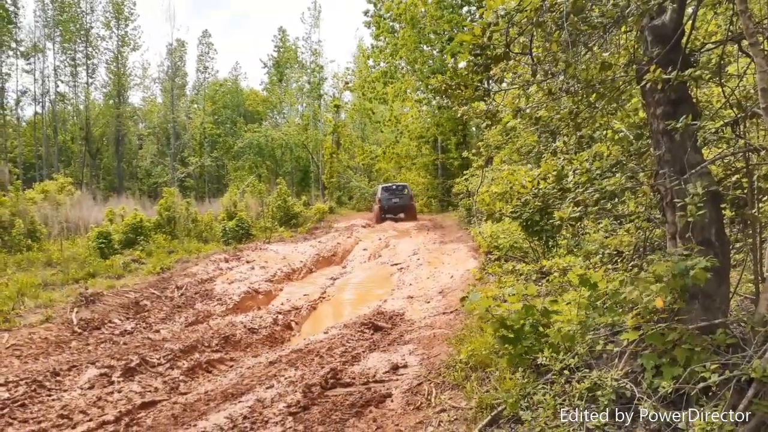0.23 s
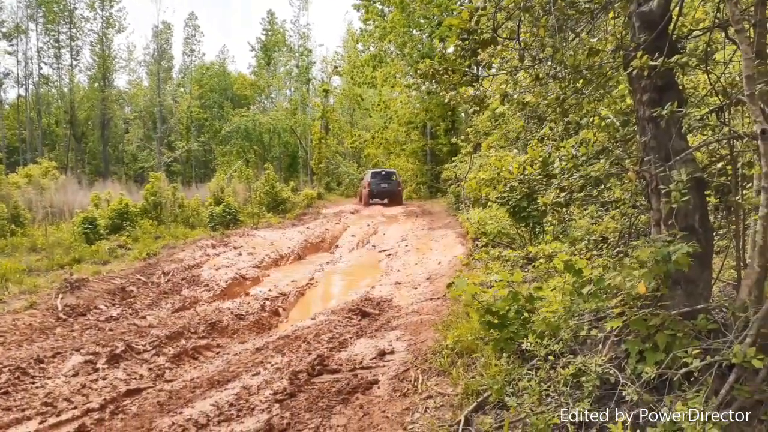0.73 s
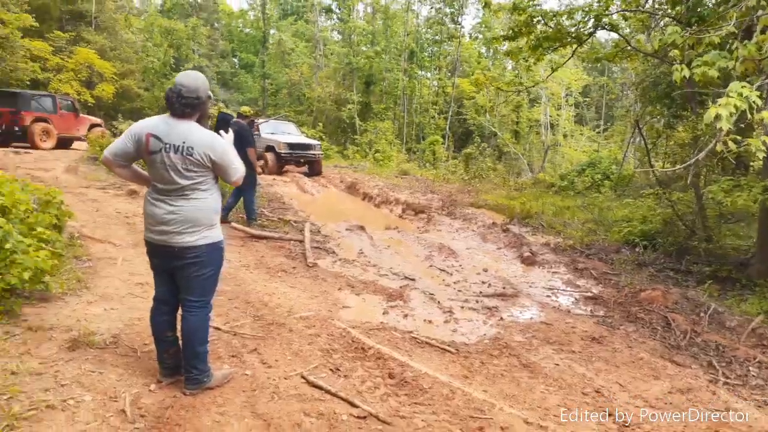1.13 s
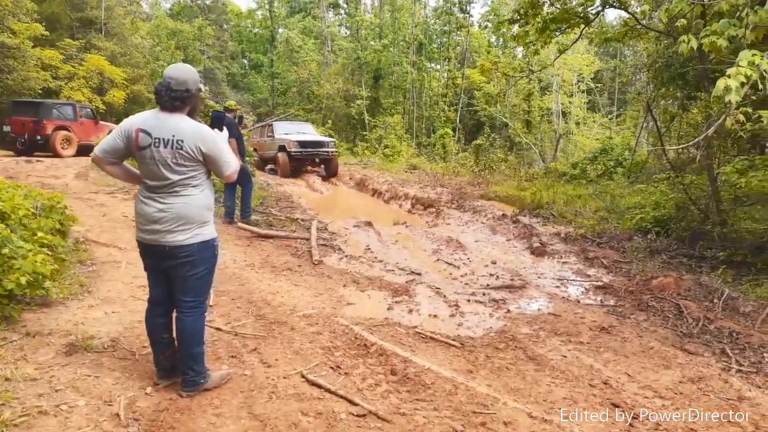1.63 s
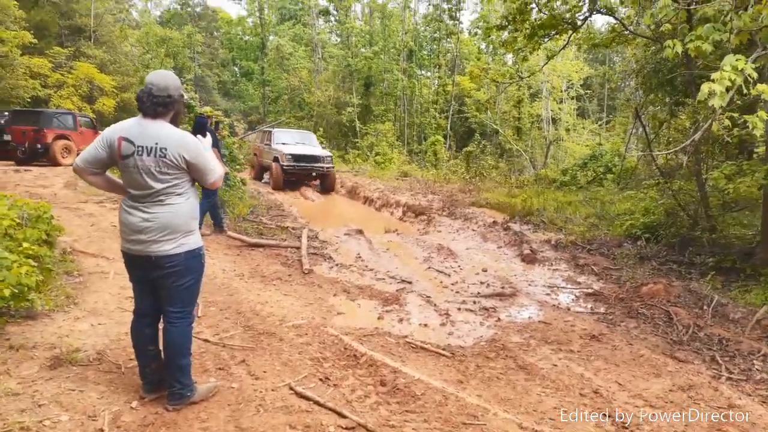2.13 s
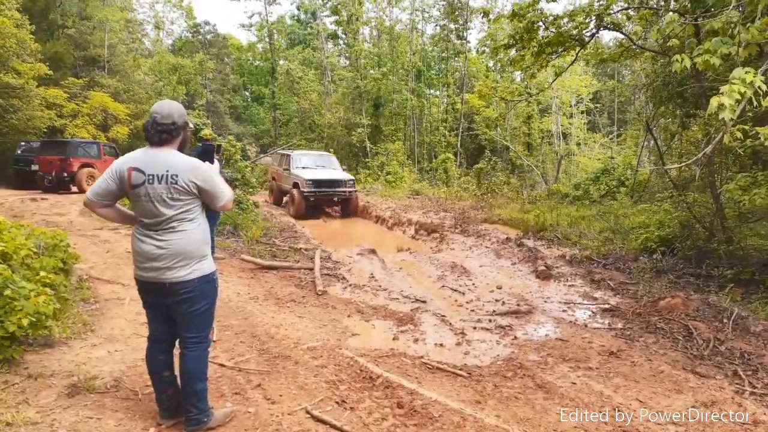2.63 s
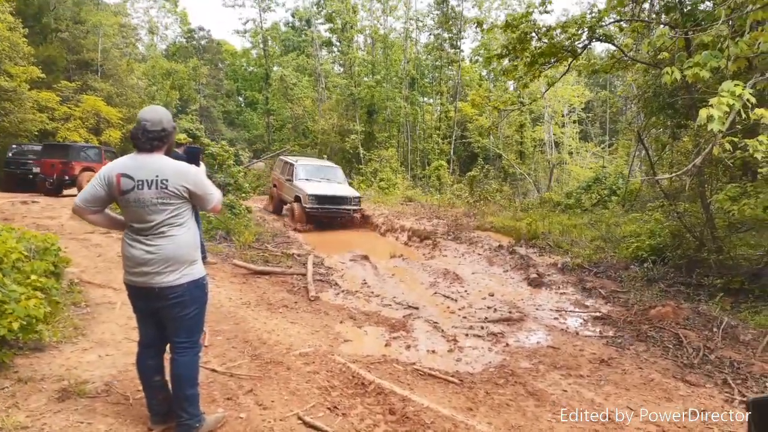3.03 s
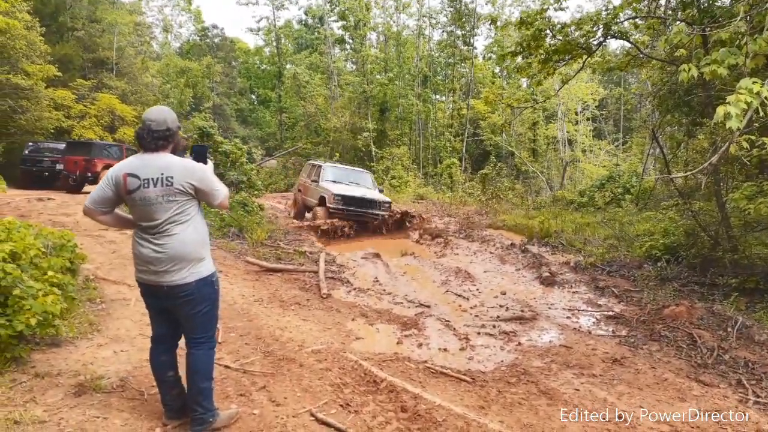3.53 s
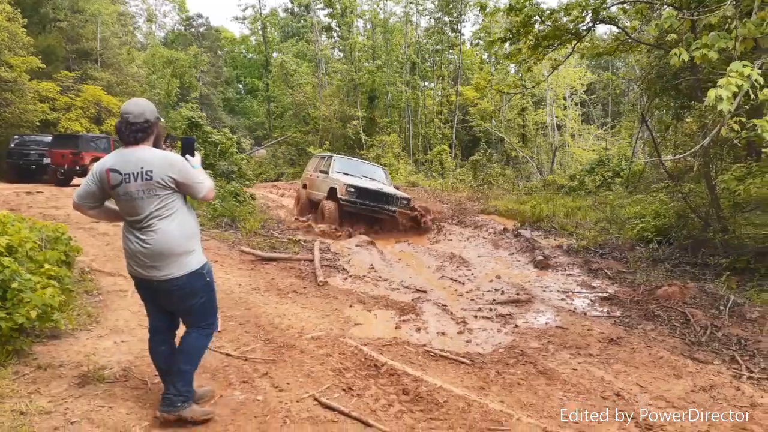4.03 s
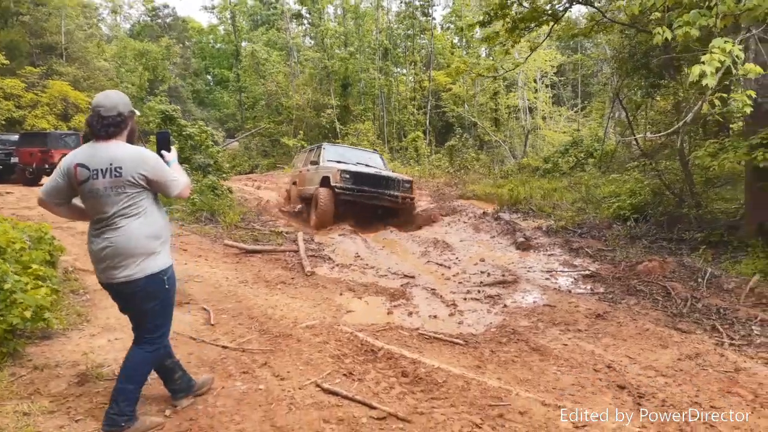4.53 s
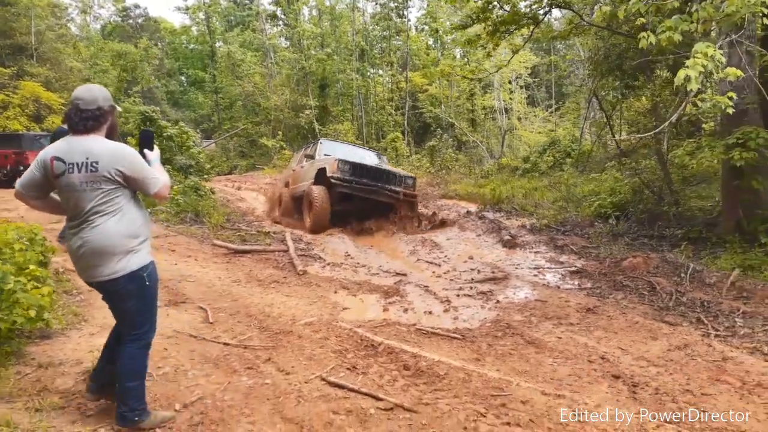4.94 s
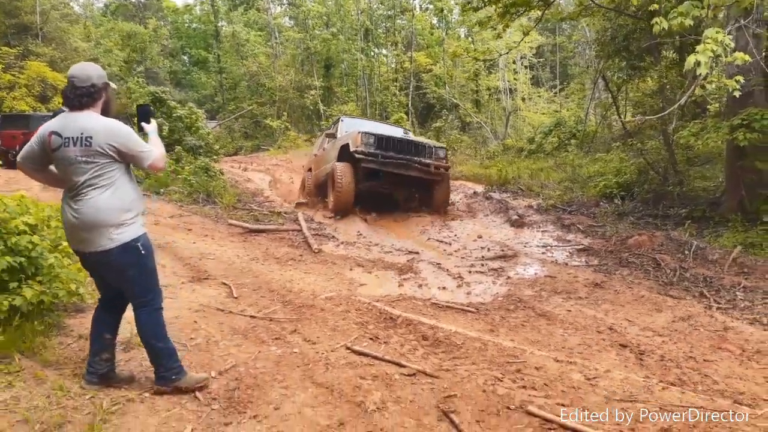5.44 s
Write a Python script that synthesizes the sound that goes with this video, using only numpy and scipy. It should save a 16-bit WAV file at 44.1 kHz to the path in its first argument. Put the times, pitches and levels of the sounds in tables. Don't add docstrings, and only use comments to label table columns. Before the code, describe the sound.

After a brief far engine drone and a short gap, a nearby four-wheel-drive labours loudly through a mud hole, climbing in pitch before backing off.

```python
import sys
import numpy as np
from scipy import signal
from scipy.fft import rfft, irfft, next_fast_len
from scipy.io import wavfile
from scipy.ndimage import uniform_filter1d, map_coordinates

SR = 44100
rng = np.random.default_rng(int(sys.argv[2]) if len(sys.argv) > 2 else 0)


def how_loud(loudness_db):
    steps = np.asarray(loudness_db, float) / 20
    return 10 ** steps


def master_out(mix):
    frames = np.transpose(np.atleast_2d(mix))
    ceiling = np.clip(frames, -1, 1)
    pcm = np.round(ceiling * 32767).astype(np.int16)
    wavfile.write(sys.argv[1], SR, pcm)


N = 250488
T = np.arange(N) / SR
# [t/s, t/s]
EDIT = (.6215, .9045)


def unit(x):
    return x / np.sqrt(np.mean(x ** 2) + 1e-20)


def along(points, hz):
    f, v = np.transpose(points)
    return np.interp(np.log(hz + 1), np.log(f + 1), v)


def curves(*tables):
    s, *cols = np.transpose(np.vstack(tables))
    return [np.interp(T, s, c) for c in cols]


def wobble(rate):
    return map_coordinates(rng.standard_normal(int(N * rate / SR) + 4), [T * rate])


def swell(s, half_s):
    return np.exp(-((T - s) / half_s) ** 2)


def filtered(x, gain):
    m = next_fast_len(N + SR // 2)
    return irfft(rfft(x, m) * gain(np.fft.rfftfreq(m, 1 / SR)), m)[..., :N]


def response(modes, f):
    return sum((-1) ** k * how_loud(db) * 1j * f * width / (centre * centre - f * f + 1j * f * width)
               for k, (centre, width, db) in enumerate(modes))


def resonant(x, modes, passes=1):
    for _ in range(passes):
        x = filtered(x, lambda f: response(modes, f))
    return x


def rush(spectrum, gate, patchy_db):
    z = signal.stft(rng.standard_normal((2, N)), nperseg=512)[2]
    field = uniform_filter1d(rng.standard_normal(z.shape[1:]), size=5, axis=0)
    field = uniform_filter1d(field, size=8, axis=1)
    pair = signal.istft(z * how_loud(patchy_db * unit(field)), nperseg=512)[1][:, :N]
    closed = [(spectrum[0][0] * 0.21, -120), *spectrum]
    return unit(filtered(pair * gate, lambda hz: how_loud(along(closed, hz))))


def firings(turns, sizes):
    when = np.interp(np.arange(1, int(turns[-1])), turns, np.arange(N))
    whole, part = when.astype(int), when % 1
    sizes = sizes[:len(when)]
    early = np.bincount(whole, sizes * (1 - part), N + 1)[:N]
    late = np.bincount(whole + 1, sizes * part, N + 1)[:N]
    return early + late


# t/s, firing f/Hz, boom level/dB, octave level/dB, overtone level/dB
FAR = [(0.0, 78.4, -35, -36, -19.5), (0.13, 74.5, -40, -54, -40), (0.4, 72.6, -34, -41, -42),
       (0.54, 74.1, -35, -48, -44), (0.6, 75.62, -25.5, -46, -48), (0.63, 75.6, -38, -39.5, -39)]
NEAR = [(0.9, 66.22, -35, -28, -22.5), (1.351, 58.2, -39, -26, -27), (2.11, 53.33, -42, -26, -22.5),
        (2.27, 61.1, -29, -25.5, -25.5), (2.49, 82.97, -17.5, -32, -29),
        (2.819, 94.56, -11.5, -22.5, -18.5), (3.161, 88.7, -17, -40.5, -27.5),
        (3.43, 95.08, -11, -24.5, -21.5), (3.758, 107.7, -10.5, -25.5, -31.5),
        (3.952, 101.5, -9.5, -21.5, -28.5), (4.26, 113.5, -10.5, -36.5, -24.5),
        (4.571, 120.3, -12.5, -26, -24.5), (4.91, 125.4, -16.5, -28.5, -27), (5.17, 136.7, -18, -30, -22.5),
        (5.28, 108.4, -29.5, -55, -39), (5.36, 89.4, -25.5, -39.5, -40), (5.549, 75.3, -32.5, -34, -42),
        (5.68, 81, -16, -32.5, -27)]
# t/s, throttle level/dB, wheel spin level/dB, mud at the outlet level/dB
LOAD = [
    [(0.0, -40, -41, 0.5), (0.34, -41.5, -47, 1.5), (0.62, -41.5, -50.5, -0.5)],
    [(0.9, -48.5, -64, 6), (1.32, -47, -61.5, 3.5), (1.52, -42, -53.5, -0.5), (2.05, -45, -54.5, 7),
     (2.27, -38.5, -50, 3.5), (2.52, -30.5, -43, 2.5), (2.83, -33, -46, 3), (3.04, -38.5, -51, 3),
     (3.45, -37, -44.5, 6), (3.72, -37.5, -44.5, 6), (4.02, -44, -47, 2), (4.27, -40.5, -46.5, 5),
     (4.64, -40, -47, 9), (4.98, -28.5, -37.5, 3.5), (5.16, -30.5, -38, 2.5), (5.22, -37, -46, 1.5),
     (5.56, -43.5, -48.5, 7.5), (5.68, -32, -45, -3)],
]
# t/s, uneven level/dB, rasp level/dB, intake howl level/dB
STUMBLES = [
    (2.47, 8, -2, -35.5),
    (5.13, 7, 2.5, -58),
]


def drive():
    car = {}
    car["rate_hz"], car["boom_db"], car["octave_db"], car["overtone_db"] = curves(FAR, NEAR)
    car["throttle_db"], car["spin_db"], car["mud_db"] = curves(*LOAD)
    car["opening_db"] = car["throttle_db"] - -36
    car["snaps"] = [swell(s, 0.13) for s, *_ in STUMBLES]
    stumbles = zip(STUMBLES, car["snaps"])
    car["shaken_db"], car["flare_db"] = sum(np.outer(row[1:3], snap) for row, snap in stumbles)
    car["turns"] = np.cumsum(car["rate_hz"] * (1 + 0.0043 * wobble(25))) / SR
    car["phase"] = 2 * np.pi * car["turns"]
    return car


def layer_db(car, middle_db, per_throttle, per_mud):
    return middle_db + per_throttle * car["opening_db"] + per_mud * car["mud_db"]


# f/Hz, width f/Hz, level/dB
ORGAN = [(176.4, 25, 1.5), (275.5, 55, -3), (357, 61, -1), (457, 70, -4.5), (680.6, 114, -6.5)]


def exhaust_boom(car):
    def pipe_db(multiple):
        return 20 * np.log10(abs(response(ORGAN, multiple * car["rate_hz"])))

    boom_db, mud_db = car["boom_db"], car["mud_db"]
    soft_db = 0.5 * np.minimum(boom_db - -14.5, 0)
    muffle_db = 0.36 * np.maximum(mud_db - 3.5, 0)
    tilt_db = np.minimum(0.23 * car["opening_db"] - muffle_db, 0)
    tone_db = [boom_db, car["octave_db"]]
    for k in range(5):
        tone_db.append(car["overtone_db"] + k * tilt_db + (k > 0) * soft_db + 2 * pipe_db(k + 3))
    ringing_db = -40.5 - 10 * (T < EDIT[1]) - np.maximum(boom_db - -33, 0) + pipe_db(6)
    tone_db[5] = np.maximum(tone_db[5], ringing_db)
    tone_db = uniform_filter1d(tone_db, size=SR // 25, axis=1)
    slack = np.interp(tone_db[0], [-28, -16], [0.7, 0.2]) + 0.2 * np.maximum(mud_db - 2, 0)
    boom = 0
    for k, db in enumerate(tone_db):
        level = how_loud(db + np.minimum(slack * (k + 0.5), 3.5) * wobble(28.05))
        drift = 0.7258 * k * k + 0.35 * slack * k * wobble(20)
        boom = boom + np.sqrt(2) * level * np.cos((k + 1) * car["phase"] + drift)
    return boom


CYLINDERS = [0.71, -0.32, 1, -0.77, 0.73, 0.87]


def cylinder_surplus(car):
    turns = car["turns"]
    count = int(turns[-1])
    luck = rng.standard_normal((count, 2))
    sizes = np.resize(CYLINDERS, count) - np.mean(CYLINDERS) + 0.3 * luck[:, 0]
    return firings(turns, sizes), firings(turns, luck[:, 1])


# f/Hz, width f/Hz, level/dB
PIPE = [(99, 30, -1), (196.9, 21, -2)]


def uneven_throb(car, surplus):
    return how_loud(layer_db(car, -38, 0.033, 0.291) + car["shaken_db"]) * unit(resonant(surplus, PIPE, 2))


# f/Hz, width f/Hz, level/dB
TAIL = [(329, 38, 0.5), (483, 61, -3), (630.6, 66, 1.5), (793, 69, -1), (1113, 610, -6)]


def tail_pipe(x):
    return unit(resonant(resonant(x, TAIL), [(596, 610, 0)]))


def rasp(car, surplus):
    level_db = layer_db(car, -40.5, 1.56, -0.25) + car["flare_db"]
    return how_loud(level_db) * tail_pipe(resonant(surplus, [(594, 1500, 0)]))


def gas_bark(car):
    pulsing = 2.2 + np.exp(0.38 * np.cos(car["phase"] - 1.3))
    level_db = layer_db(car, -34, 0.74, 0.76) + car["flare_db"] - 4.5
    return how_loud(level_db) * tail_pipe(rng.standard_normal((2, N)) * pulsing)


# f/Hz, width f/Hz, level/dB
DROWNED = [(300.4, 130, 11.5), (410, 52, 4.5)]
# t/s, half length t/s, growl gain level/dB
GURGLES = [
    (.03, .06, 8),
    (.42, .15, 7.5),
    (3.719, 0.096, 8.5),
    (4.284, 0.072, 11),
    (4.462, 0.067, 13.5),
    (4.639, 0.085, 14),
    (5.44, .05, 7.5),
]


def mud_growl(car, surplus, chance):
    dips_db = sum(db * swell(s, half_s) for s, half_s, db in GURGLES)
    level_db = layer_db(car, -43.5, 0.67, 1.04) + dips_db
    return how_loud(level_db) * unit(resonant(surplus + 0.6 * chance, DROWNED, 2))


def metal_knock(car):
    beat = 1.5 + np.exp(0.8 * np.cos(car["phase"])) * how_loud(1.6 * wobble(60))
    return beat, rush([(700, 0), (7000, 0)], beat, patchy_db=2.2)


# f/Hz, width f/Hz, level/dB
PANELS = [
    [(640, 74, -5.5), (1086, 74, -0.5), (1600, 560, -9), (2340, 640, -10.5)],
    [(954, 187, -2.5), (1422, 74, 1.5), (1790, 98, 0.5), (2277, 380, -0.5), (2644, 340, 2), (2984, 640, -3),
     (4000, 330, -16.5)],
    [(890, 270, 1.5), (1643, 160, 0), (2110, 250, 0), (2680, 126, 7.5), (3145, 135, 1.5), (4020, 170, 0.5),
     (3970, 1230, -5)],
]
# f/Hz, level/dB per Hz
BLOCK = [(1000, -31), (1600, 4), (2500, -14.5), (3300, -12.5), (4500, -5.5), (6500, -16), (8500, -45.5),
         (12000, -120)]


def clatter(car, beat, knock):
    close = np.interp(T, [4.6, 4.9, 5.17, 5.25], [0.05, 0.97, 0.94, 0.19])
    views = [T < EDIT[1], (T >= EDIT[1]) * np.sqrt(1 - close), np.sqrt(close)]
    ringing = sum(share * unit(resonant(knock, modes)) for share, modes in zip(views, PANELS))
    return how_loud(car["throttle_db"] + 1.0) * (0.92 * ringing + 0.4 * rush(BLOCK, beat, patchy_db=2))


# f/Hz, level/dB per Hz
SPRAY = [(2650, -0.5), (4500, -1), (5260, -2.5), (6490, -4.5), (8260, -1), (9460, -2.5), (12600, -1),
         (15100, -8)]


def mud_spray(car):
    gate = how_loud(0.9 * wobble(90) + 0.16 * np.cos(car["phase"]))
    return how_loud(car["spin_db"] + 5.5) * rush(SPRAY, gate, patchy_db=-2.1)


# f/Hz, level/dB per Hz
CHURN = [(40, -59.5), (65, 8), (100, 12), (180, 5.5), (300, -0.5), (400, -5.5), (600, -4), (1000, -30.5)]


def mud_churn(car):
    return how_loud(layer_db(car, -33.5, 0.1, 0.64)) * rush(CHURN, how_loud(1.2 * wobble(22.27)), patchy_db=-2.5)


# f/Hz, level/dB per Hz
GROUND = [(15, -31.5), (30, -4), (45, -1), (60, -9), (90, -42)]


def ground():
    level_db = np.interp(T, [0, 0.6, 2, 3.5, 5, 5.68], [-57, -39, -57, -46.0, -55.0, -55])
    return how_loud(level_db) * rush(GROUND, how_loud(5.1 * wobble(6.7)), patchy_db=-4.5)


# f/Hz, width f/Hz, level/dB
INTAKE = [(1060, 64, 2.5), (1360, 180, 0), (2460, 280, -2.5)]


def intake_howl(car, knock):
    level = sum(how_loud(row[3]) * np.sqrt(snap) for row, snap in zip(STUMBLES, car["snaps"]))
    return level * unit(resonant(knock, INTAKE, 2))


BANKS = [-51, -33.5, -38, -41.5]


def split_banks(car):
    loaded = np.interp(T, [4.0, 4.1, 5.25, 5.33], [0, 1, 1, 0])
    tones = 0
    for k, db in enumerate(BANKS):
        level = how_loud(db + (k == 0) * 1.5 * car["flare_db"] + 5 * wobble(30))
        tones = tones + np.sqrt(2) * level * np.cos((k + 1.5) * car["phase"] + 2.09 * k + wobble(30))
    return loaded * tones


# f/Hz, width f/Hz, level/dB
BURBLE_PIPE = [(454, 75, 0)]
# t/s, half length t/s, level/dB
BURBLES = [
    (5.161, 0.077, -28),
    (5.36, 0.083, -35.5),
    (5.579, .08, -37),
]


def burble(chance):
    level = sum(how_loud(db) * swell(s, half_s) for s, half_s, db in BURBLES)
    return level * unit(resonant(chance, BURBLE_PIPE, 2))


def vehicle():
    car = drive()
    surplus, chance = cylinder_surplus(car)
    beat, knock = metal_knock(car)
    tonal = exhaust_boom(car) + uneven_throb(car, surplus) + rasp(car, surplus)
    tonal = tonal + mud_growl(car, surplus, chance) + split_banks(car) + burble(chance)
    noisy = gas_bark(car) + clatter(car, beat, knock) + mud_spray(car) + mud_churn(car)
    noisy = noisy + intake_howl(car, knock)
    return noisy + [tonal, 0.1 * np.roll(tonal, 90)]


# f/Hz, likeness 0 to 1
ALIKE = [(60, 1), (250, 0.98), (500, 0.92), (1000, 0.76), (2000, 1), (4000, 0.41), (8000, 0.43),
         (15000, 0.059)]
# f/Hz, level/dB
LEAN = [(60, 0.5), (180, 1), (550, -0.5), (1650, 0.5), (4970, 0.5), (15000, 0)]


def two_ports(parts):
    lag_s = -0.00007

    def split(hz):
        turn = np.arccos(np.clip(along(ALIKE, hz), 0, 0.999)) / 2
        return np.array([np.cos(turn), np.sin(turn)])

    def ports(hz):
        left = how_loud(along(LEAN, hz) / 2) * np.exp(-1j * np.pi * hz * lag_s)
        return left ** np.array([[1], [-1]])

    mid, side = filtered(parts, split)
    return filtered(np.array([mid + side, mid - side]), ports)


def scene():
    return two_ports(vehicle() + ground())


def roll_off(x):
    return signal.sosfilt(signal.butter(12, 15860, fs=SR, output="sos"), x)


def record(dry):
    since_s = T - EDIT[0]
    tail = 0.02 * how_loud(-60 * since_s / 0.05) * (T < EDIT[0] + 0.03)
    fade = np.where(T < EDIT[0], 1, tail)
    return roll_off(dry * np.where(T >= EDIT[1], 1, fade))


dry = scene()
out = record(dry)
master_out(out)
```